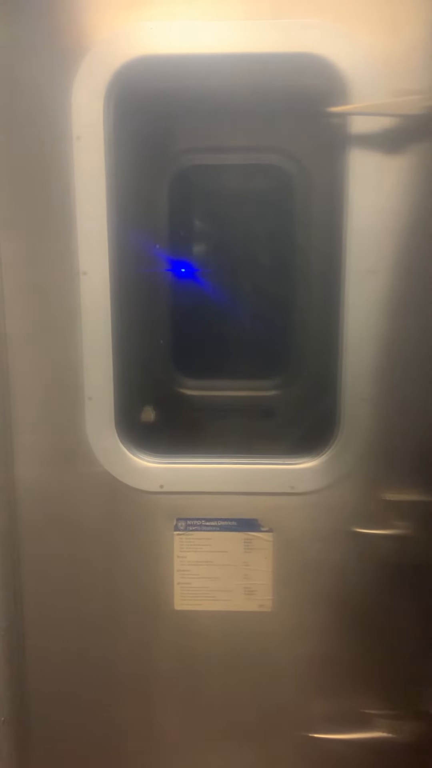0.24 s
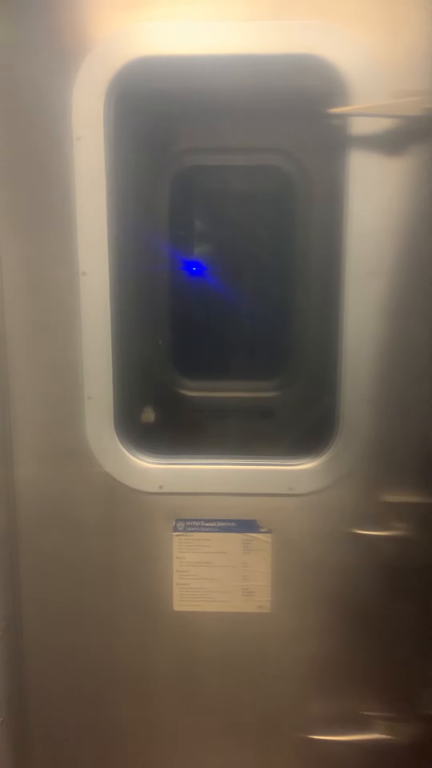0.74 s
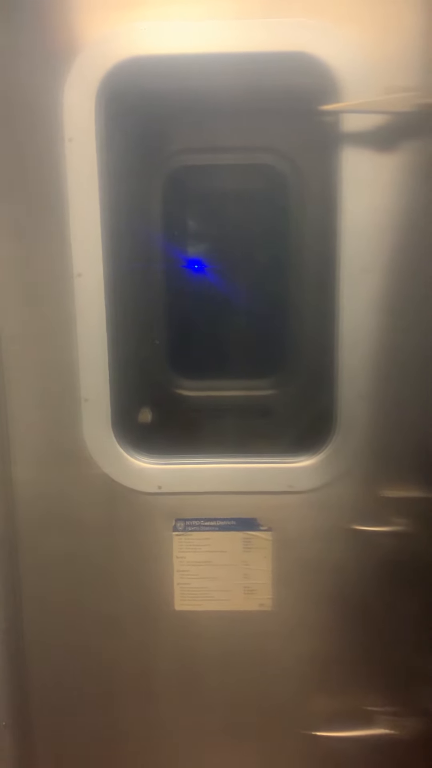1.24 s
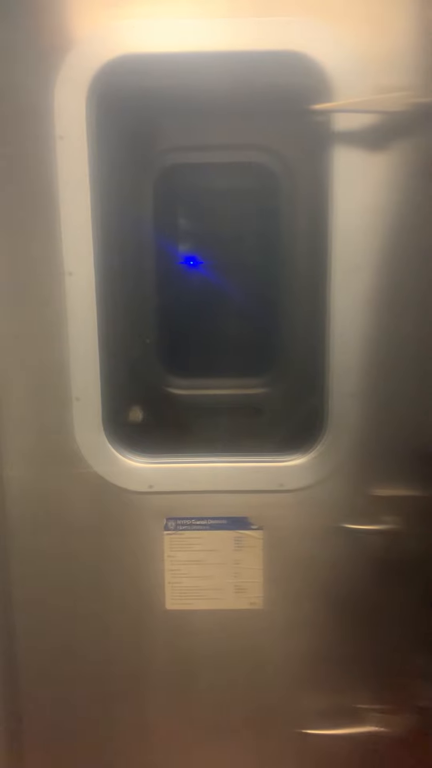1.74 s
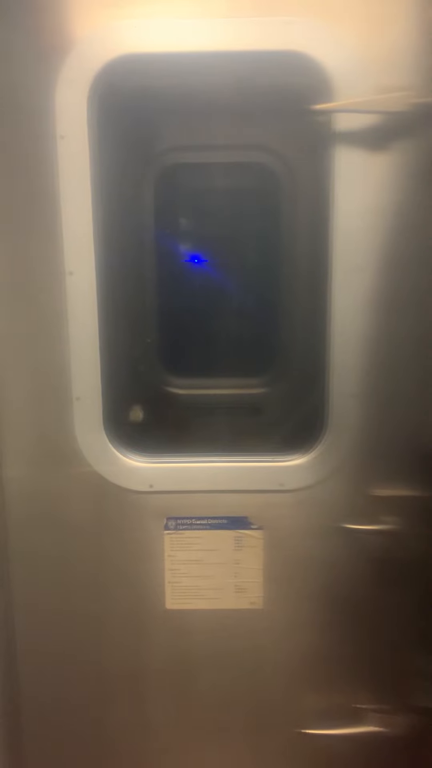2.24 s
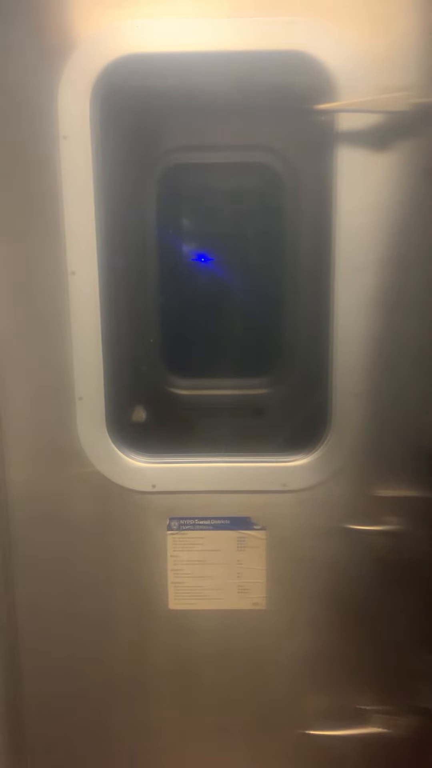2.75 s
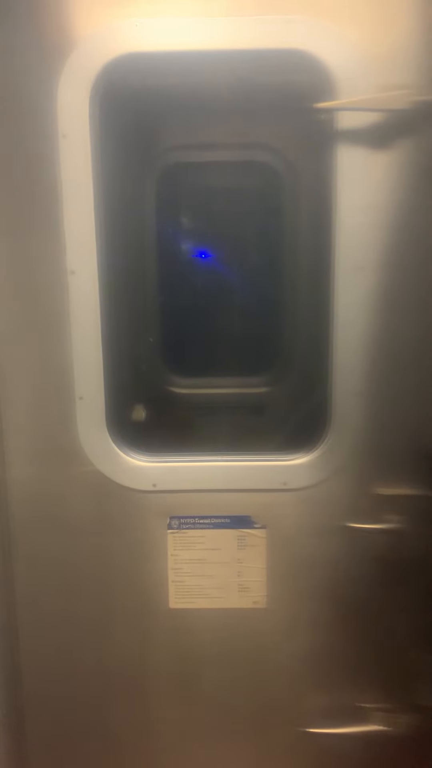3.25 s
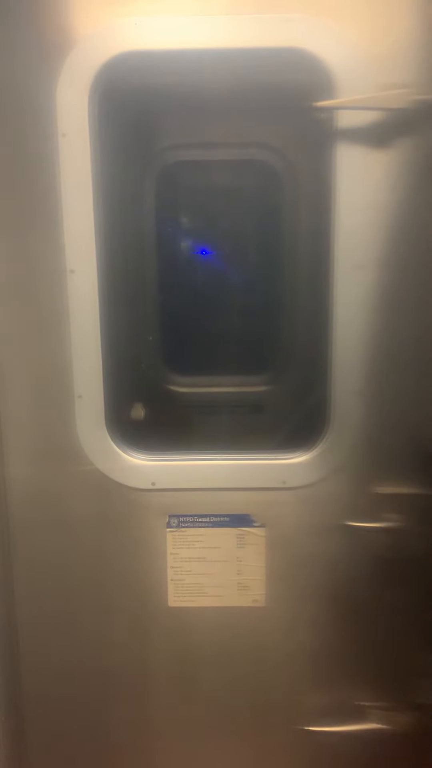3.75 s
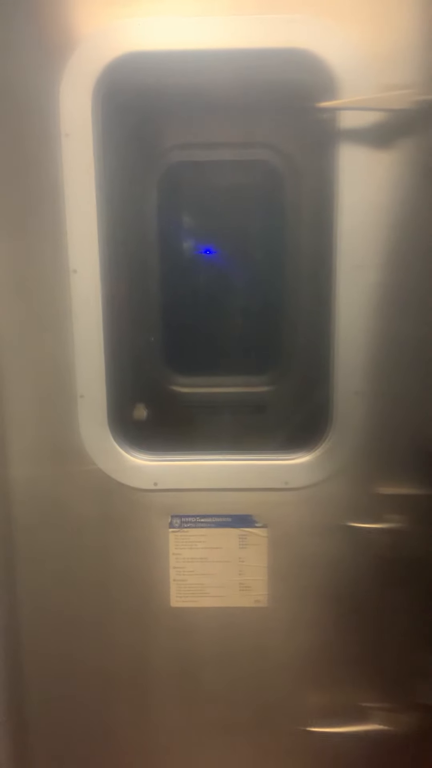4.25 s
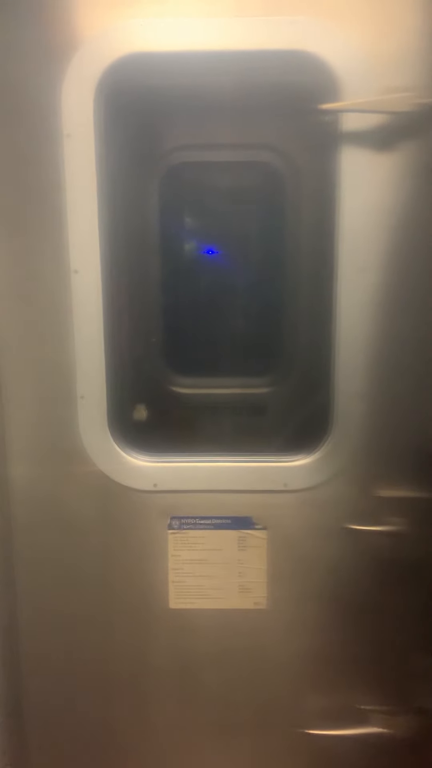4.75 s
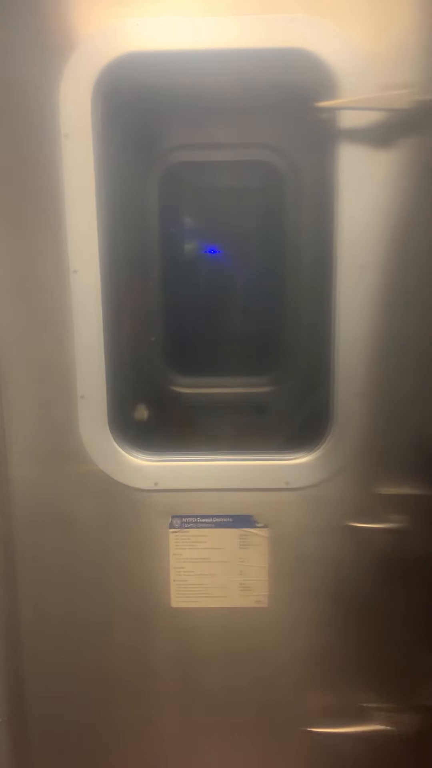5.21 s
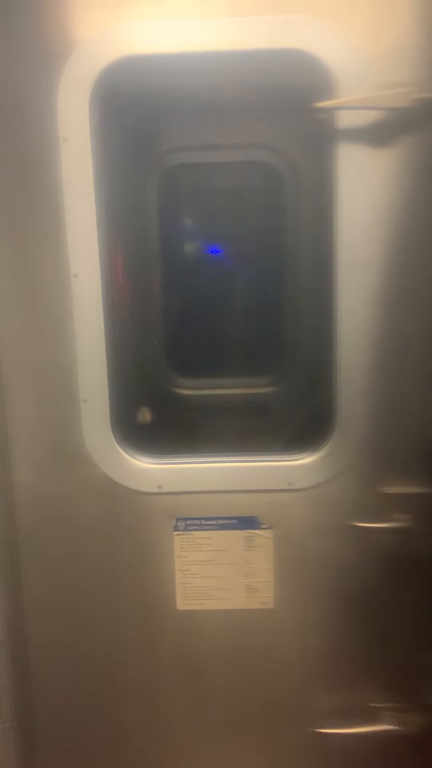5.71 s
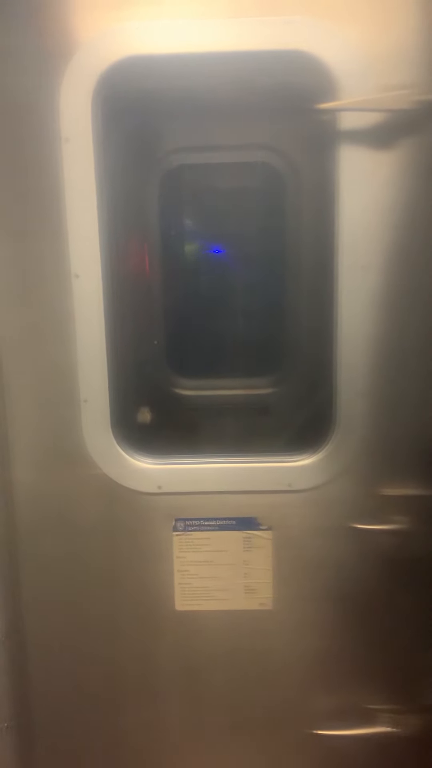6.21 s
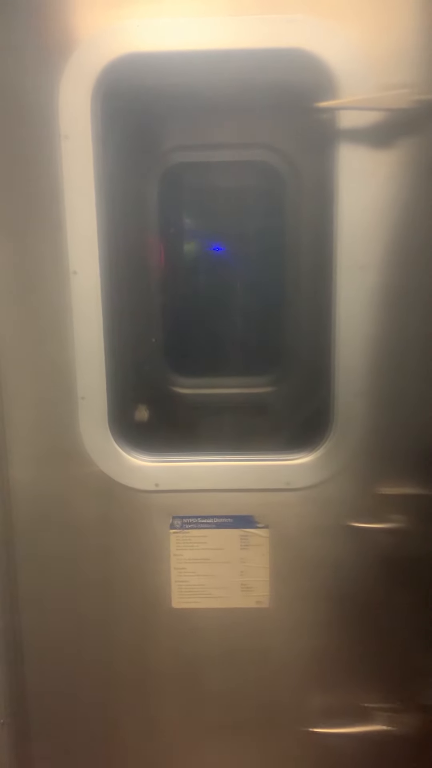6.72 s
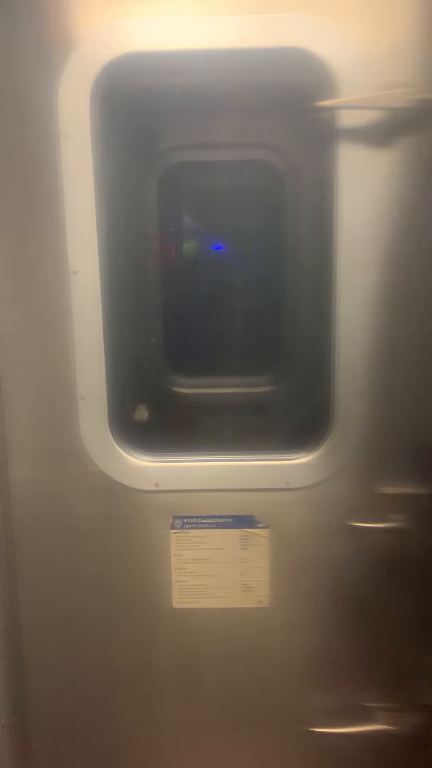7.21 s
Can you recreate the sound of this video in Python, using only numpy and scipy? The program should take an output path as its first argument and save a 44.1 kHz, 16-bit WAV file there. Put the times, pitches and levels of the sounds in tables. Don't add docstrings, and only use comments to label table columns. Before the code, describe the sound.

Inside the rear car of a subway train running through a tunnel, a heavy low wheel-on-rail roar continues throughout, swelling briefly over joints. Panels shudder early on, a sharp dry crack snaps just after one second, and small ticks and metal chinks follow. A bit past four seconds a loose door part clacks and thumps repeatedly, then once more later. Handheld microphone close to the door, nearly mono.

```python
import sys
import numpy as np
from scipy import signal
from scipy.fft import rfft, irfft, next_fast_len
from scipy.io import wavfile

SR = 44100
rng = np.random.default_rng(int(sys.argv[2]) if len(sys.argv) > 2 else 0)


def log_audio(samples):
    frames = np.atleast_2d(samples).T
    limited = np.clip(frames, -1, 1)
    pcm = np.round(limited * 32767).astype(np.int16)
    wavfile.write(sys.argv[1], SR, pcm)


def decibels_to_gain(level_db):
    exponent = np.asarray(level_db, float) / 20
    return 10 ** exponent


N = 329418
SIZE = next_fast_len(N + 4096)
HZ = np.maximum(np.fft.rfftfreq(SIZE, 1 / SR), 1)


def at_hz(points, column=1):
    points = np.array(points)
    return np.interp(np.log(HZ), np.log(points[:, 0]), points[:, column])


def drift(rate_hz):
    r = np.exp(-80 * np.pi * rate_hz / SR)
    slow = signal.lfilter([1], [1, -2 * r, r * r], rng.standard_normal(N // 40 + 2002))
    slow = slow[2000:]
    return np.interp(np.arange(N) / 40, np.arange(len(slow)), slow / slow.std())


def ring(force, hz, t60_s):
    r, w = decibels_to_gain(-60 / (t60_s * SR)), 2 * np.pi * hz / SR
    return signal.lfilter([0, np.sin(w)], [1, -2 * r * np.cos(w), r * r], force + 1e-18)


def soften(x, hz):
    return signal.sosfilt(signal.butter(2, min(hz, 20000), fs=SR, output="sos"), x)


def bandpass(order, low_hz, high_hz):
    return signal.butter(order, [low_hz, high_hz], "band", fs=SR, output="sos")


def pulse(t, rise_s, fall_s):
    t = np.maximum(t, 0)
    return (1 - np.exp(-t / rise_s)) * np.exp(-t / fall_s)


def add(out, s, sound):
    i = round(s * SR)
    out[i:i + len(sound)] += sound[:N - i]


# (frequency [Hz], left-right likeness [0-1], left minus right [dB])
PORTS = [(60, 0.99, 0.9), (200, 0.97, 3.5), (400, 0.85, 1.5), (770, 0.68, -1), (1320, 0.46, -1.5),
         (1950, 0.8, 0.5), (2200, 0, -1), (2350, 0.8, 0.5), (3200, 0.7, -0.5), (3900, 0.9, 0),
         (4450, 0.97, 1.5), (5000, 1, 0), (5500, 0.99, -0.5), (15000, 0.92, 0.5)]


def diffuse_noise():
    shared, own = rfft(rng.standard_normal((2, SIZE)))
    alike = np.clip(at_hz(PORTS), 0, 1)
    return np.sqrt(1 + alike) * shared + np.sqrt(1 - alike) * own * np.array([[1], [-1]])


# (time [s], level [dB])
TRACK = [(0.0, -25), (0.35, -22.5), (0.56, -21), (1.02, -25), (1.27, -21.5), (1.81, -24.5), (2.21, -23.5),
         (3.58, -26.5), (4.2, -23.5), (4.43, -24), (4.6, -23.5), (5.08, -23), (5.18, -25), (6.57, -26.5),
         (6.99, -23.5), (7.47, -25)]
TRACK_SHARE = [1.8, 0.35, .25, 0.37]
# (time [s], swell over the roar [dB], lean to the highs [dB per register], dying time [s])
JOINTS = [(0.319, 6, -1, 0.074), (.45, -6.5, -4.5, 0.048), (.59, 3.5, 0, 0.088), (.705, 0, 0, 0.086),
          (1.05, 3, -5, 0.02), (1.95, 0.5, 0, 0.053), (2.25, -3.5, 0, 0.25), (3.49, 0.5, -5.5, 0.026),
          (3.62, 4, 3.5, 0.039), (3.92, -2, 3, 0.045), (4.87, -11.5, -1.5, .1), (5.07, -10, -5.5, 0.072),
          (5.79, -6.5, -0.5, 0.022), (6.9, -9, 1, 0.029), (7.24, -5, 3.5, 0.087), (7.41, -1, -4.5, .05)]
JOINT_REACH_DB = [-4, 1, 0.1, 0.5]
JOINT_RISE_S = 0.022
SHUDDER_DB, SHUDDER_S = 11, 0.06


def swells(t):
    track_db = np.interp(t, *np.transpose(TRACK))
    power = np.ones((4, len(t)))
    for s, db, lean_db, fall_s in JOINTS:
        reach_db = db + np.array(JOINT_REACH_DB) + lean_db * (np.arange(4) - 2)
        power += decibels_to_gain(reach_db)[:, None] ** 2 * pulse(t - s, JOINT_RISE_S, fall_s)
    for s, db, *_ in THUMPS:
        power[0] += decibels_to_gain(db + SHUDDER_DB) ** 2 * pulse(t - s, JOINT_RISE_S, SHUDDER_S)
    return np.outer(TRACK_SHARE, track_db - np.median(track_db)) + 10 * np.log10(power)


REGISTER_HZ = [70, 300, 2000, 7000]
# (frequency [Hz], density [dB per Hz])
ROAR = [(20, -25), (45, 0), (100, 1.54), (330, 0), (700, -11.5), (1150, -15.5), (1600, -23), (2500, -26),
        (3950, -28.5), (4500, -37.5), (6500, -37), (7800, -58), (11000, -65), (14500, -69.5)]
ROAR_DB = -24
# (frequency [Hz], width [Hz], gain [dB], negative = dip)
PANELS = [(106, 13, 1.5), (158, 14, 0), (250.5, 28, -3), (338, 56, 2), (404, 24, -3.5), (453, 28, 3.5),
          (500, 40, -3), (619, 76, 3.5), (1070, 133, 4.5), (2520, 340, 2.5), (5150, 460, 4.5),
          (6050, 400, -5), (6450, 300, -7), (9100, 550, 4.5)]
# (lag [s], ripple depth [dB])
ECHOES = [(.0043, 0.7), (.0071, 0.85), (0.0118, 0.7), (.0173, 0.65)]


def roar(shared_db, own_db):
    colour_db = at_hz(ROAR)
    colour_db += sum(db / (1 + (2 * (HZ - hz) / width) ** 2) for hz, width, db in PANELS)
    ripple_db = sum(db * np.cos(2 * np.pi * HZ * lag) for lag, db in ECHOES)
    colour_db += np.clip(HZ / 1500 - 0.5, 0, 1) * ripple_db
    spectrum = diffuse_noise() * decibels_to_gain(colour_db) / (1 + (HZ / 14800) ** 30)
    grid_s = np.arange(0, N / SR, 0.004)
    levels_db = swells(grid_s)
    jolts = drift(9)
    place = np.clip(1.5 * np.log2(HZ / 25), 0, 14)
    out = 0
    for k in range(15):
        register = np.interp(np.log(25 * 2 ** (k / 1.5)), np.log(REGISTER_HZ), range(4))
        share = np.clip(1 - abs(register - np.arange(4)), 0, 1)
        swell_db = np.interp(np.arange(N) / SR, grid_s, share @ levels_db)
        band = irfft(spectrum * np.clip(1 - abs(place - k), 0, 1), SIZE)[:, :N]
        out = out + band * decibels_to_gain(swell_db + shared_db * jolts + own_db * drift(11.0))
    return decibels_to_gain(ROAR_DB) * out / irfft(spectrum, SIZE).std()


# (time [s], peak [dB], panel pitch [Hz], overtone share [ratio], widest-swing delay [s])
THUMPS = [(4.2033, -5.5, 83.6, 0.68, 0.0089), (4.255, -13, 85.6, .29, .006), (4.335, -3.5, 86, .15, .013),
          (4.392, -12, 83.6, .19, .006), (4.4155, -16, 83, .2, .012), (4.461, -11.5, 85, 0.19, .007),
          (4.503, -15, 84, .2, .009), (4.5265, -14, 80, .2, .009), (4.56, -5.5, 83, .38, .011),
          (4.6125, -11, 82, 0.25, .004), (5.413, -5.5, 80.7, 0.6, .009), (5.468, -17, 85, .17, .009)]


def thumps():
    out, t = np.zeros(N), np.arange(-800, 2500) / SR
    for s, db, hz, overtone, delay_s in THUMPS:
        swing = np.exp(-((t - delay_s) / 0.015) ** 2)
        turn = 2 * np.pi * hz * t
        add(out, s + t[0], decibels_to_gain(db) * 0.6 * swing * (np.sin(turn) + overtone * np.sin(2 * turn)))
    return out


# (time [s], peak [dB], rebound [dB], bright crack [dB])
CLACKS = [(0.3277, -29, 0, -53), (1.961, -25, -6, -56), (2.2286, -26, -5, -64), (3.635, -26, -1, -58.5),
          (3.9338, -28, -9, -64), (4.1786, -16, -1, -36), (4.21, -37, -9, -35), (4.3127, -19, -1, -36),
          (4.343, -28, -8, -48), (4.543, -26, -10, -58), (5.3867, -15.5, -6, -38)]
# (frequency [Hz], level [dB], t60 [s])
CLACK_MODES = [(950, -14, 0.033), (1292, -4, 0.06), (1456, -6.5, 0.043), (1705, -6, 0.046),
               (2080, -10.5, 0.016), (2600, -9, 0.022), (3140, -5, 0.016), (3510, -8.5, 0.016)]


def clacks():
    out, t = np.zeros(N), np.arange(4500) / SR
    rebound_s = 0.011
    bright = bandpass(3, 4800, 8000)
    for s, db, rebound_db, crack_db in CLACKS:
        rattle = rng.random(len(t)) < 0.05
        force = 0.11 * rng.standard_normal(len(t)) * np.exp(-t / 0.013) * rattle
        force[[0, round(rebound_s * SR)]] = 1, decibels_to_gain(rebound_db)
        force = soften(force, hz=5000)
        body = 0
        for k, (hz, mode_db, t60_s) in enumerate(CLACK_MODES):
            uneven_db = mode_db - 8.5 + rng.normal(0, 1.8)
            body = body + (-1) ** k * decibels_to_gain(uneven_db) * ring(force, hz, t60_s)
        burst = np.exp(-t / 0.0022) + 0.15 * np.exp(-t / 0.015) + 0.4 * pulse(t - rebound_s, 0.0003, 0.002)
        crack = signal.sosfilt(bright, rng.standard_normal(len(t)) * burst)
        add(out, s, decibels_to_gain(db) * body + decibels_to_gain(crack_db) * crack)
    return out


# (time [s], peak [dB], pitch [Hz])
SWINGS = [(0.359, -23.5, 139.4), (0.374, -22, 281), (0.399, -21.7, 105.5), (0.409, -25, 409),
          (0.414, -33.0, 651), (0.419, -22.5, 137), (0.459, -24, 366), (0.464, -27, 82.5),
          (0.469, -21, 293), (0.489, -27, 177.5), (0.539, -27.4, 345), (0.614, -24.2, 159.4),
          (0.614, -24.0, 62), (0.624, -27, 422), (0.624, -27, 197), (0.639, -28.3, 363),
          (0.639, -23.8, 288), (0.668, -23.2, 132), (0.708, -18.5, 89.5), (0.718, -24.0, 137),
          (0.738, -29.5, 445.5), (0.768, -28, 250), (0.773, -28.3, 374), (0.788, -21, 81),
          (0.813, -24, 304), (1.023, -27.2, 230), (1.063, -26, 283), (1.068, -28.8, 438),
          (1.078, -27.2, 325), (1.187, -28, 115.6), (1.212, -24.5, 444), (1.267, -24, 288),
          (1.442, -27.5, 447), (1.566, -23.5, 156), (1.746, -26, 185), (1.781, -28.5, 439), (2.0, -23, 362),
          (2.05, -26.8, 283), (2.05, -24.5, 86), (2.105, -25, 319), (2.275, -26.9, 325), (2.764, -26, 81),
          (3.672, -27.5, 420), (4.071, -24, 109), (4.894, -26, 62), (5.792, -24.5, 339),
          (7.174, -28.4, 362), (7.259, -30, 534)]
SWING_S = 0.035


def swings():
    out, t = np.zeros(N), np.arange(-3500, 3500) / SR
    push = np.exp(-(t / SWING_S) ** 2)
    for s, db, hz in SWINGS:
        turns = hz * t * (1 - 0.23 * t) + rng.random()
        add(out, max(s + t[0], 0), decibels_to_gain(db) * push * np.sin(2 * np.pi * turns))
    return out


# (time [s], peak [dB], pitch [Hz])
KNOCKS = [(.089, -24, 600), (.338, -22, 611), (.549, -26, 616), (1.247, -25, 581), (1.516, -25, 573),
          (2.231, -25, 563), (2.776, -22, 638), (4.635, -27, 627), (4.889, -25, 563), (5.697, -27.5, 1130),
          (6.154, -26.5, 622), (7.091, -25.5, 600)]


def knocks():
    out, click = np.zeros(N), np.zeros(7000)
    click[0] = 1
    for s, db, hz in KNOCKS:
        add(out, s, decibels_to_gain(db) * ring(soften(click, hz=2500), hz, t60_s=0.022))
    return out


# time [s], peak [dB]
CRACK = (1.2881, -12)
# (frequency [Hz], level [dB], t60 [s])
CRACK_MODES = [(1000, -12, .004), (1700, -11.5, 0.006), (2300, -10, .004), (3900, -4, 0.0028),
               (5420, -12, 0.0053), (6720, -10, 0.0013), (8750, -1, 0.0009), (13000, -7, 0.00043)]


def crack():
    out, click = np.zeros(N), np.zeros(600)
    click[0] = 1.26
    blow = soften(click, hz=14000)
    body = sum(decibels_to_gain(db) * ring(blow, hz, t60_s) for hz, db, t60_s in CRACK_MODES)
    add(out, CRACK[0], decibels_to_gain(CRACK[1]) * body)
    return out


# (time [s], peak [dB])
TICKS = [(0.4194, -43.5), (1.506, -58), (1.592, -66), (1.954, -53), (2.14, -47.5), (2.2248, -64.5),
         (2.5994, -70.5), (3.076, -61.5), (3.273, -65), (3.2917, -46), (3.302, -65), (3.511, -47),
         (3.7786, -52.5), (3.7944, -73), (3.8307, -48.5), (3.8541, -52.5), (.3207, -59.5), (.381, -61.5),
         (.5831, -66.5), (2.2747, -62), (3.771, -62), (4.1796, -55), (4.2093, -57), (4.307, -61.5),
         (4.3131, -53.5), (4.4248, -64), (5.3872, -64)]
TICK_APART = 0.35


def ticks():
    out, t = np.zeros((2, N)), np.arange(600) / SR
    band = bandpass(3, 4000, 14500)
    for s, db in TICKS + [(CRACK[0], CRACK[1] - 27)]:
        decay = np.exp(-t / 0.0003) + 0.019 * np.exp(-t / 0.0035)
        shared, own = rng.standard_normal((2, len(t))) * decay
        shared[0] += 3.0
        apart = TICK_APART * 2 * own
        snap = signal.sosfilt(band, [shared + apart, shared - apart])
        for port in range(2):
            add(out[port], s, decibels_to_gain(db + 10.5) * snap[port] / abs(snap).max())
    return out


# (time [s], peak [dB], pitch [Hz], t60 [s])
CHINKS = [(0.2329, -57, 10500, 0.05), (0.942, -59, 12000, 0.046), (1.0377, -60, 11500, 0.056),
          (1.063, -50.5, 11760, 0.05), (1.1395, -47, 11950, 0.057), (1.1448, -48, 11900, .04),
          (1.7569, -62, 11000, 0.056), (1.948, -49, 11570, 0.08), (2.027, -50, 11070, 0.054),
          (2.4638, -49.5, 11000, 0.05), (2.475, -51, 11100, 0.056), (2.566, -49.5, 10740, 0.046),
          (2.678, -45.5, 11150, 0.05), (4.1495, -54.5, 11400, 0.035), (4.265, -60, 11700, 0.05),
          (5.452, -65, 11400, 0.044), (6.4507, -65.5, 11200, 0.046)]


def chinks():
    out, t = np.zeros(N), np.arange(5000) / SR
    for s, db, hz, t60_s in CHINKS:
        force = rng.standard_normal(len(t)) * t * np.exp(-t / 0.0021)
        force = ring(force, hz * 1.01, 0.0054)
        spread = 0.016 * (np.arange(-2, 3) + rng.normal(0, 0.3, 5))
        sound = sum(ring(force, hz * (1 + d), max(t60_s, 0.01)) for d in spread)
        echo = rng.standard_normal(len(t)) * np.exp(-t / 0.02) * abs(force).max()
        sound += 0.12 * ring(echo, hz, 0.004)
        add(out, s - 0.001, decibels_to_gain(db + 2.5) * sound / abs(sound).max())
    return out


def rub(out, s, length_s, hz, width_hz, db):
    t = np.arange(-length_s, length_s, 1 / SR)
    swell = np.exp(-(2 * t / length_s) ** 2)
    grains = rng.standard_normal(len(t)) * decibels_to_gain(2.5 * rng.exponential(1, len(t)))
    band = signal.sosfilt(bandpass(2, hz - width_hz / 2, hz + width_hz / 2), grains)
    rms = np.sqrt(np.average(band ** 2, weights=swell ** 2))
    add(out, s + t[0], decibels_to_gain(db) * swell * band / rms)


# (time [s], length [s], pitch [Hz], width [Hz], level [dB rms])
GRAINY_SWELLS = [(.335, .03, 2860, 300, -41), (.345, .06, 2200, 1500, -40), (.41, .09, 2200, 1500, -41),
                 (4.22, .05, 2600, 500, -45), (5.48, .01, 6500, 600, -52), (5.467, .01, 2500, 500, -40),
                 (.66, .06, 2300, 2000, -46), (3.943, .035, 1000, 340, -28), (3.95, .065, 2700, 830, -44),
                 (3.74, .06, 900, 45, -37), (3.3, .03, 300, 110, -28), (4.01, .03, 280, 120, -27),
                 (3.27, 0.075, 88, 53, -26.5), (5.2, 0.095, 105, 54, -26.5), (3.75, .05, 70, 50, -27),
                 (2.75, .06, 760, 640, -34.5), (.1, .09, 100, 51, -31), (1.88, .087, 70, 40, -30),
                 (7.43, .028, 300, 160, -26.5), (5.7, .15, 115, 23, -29), (7.06, .08, 330, 50, -28.5),
                 (.74, .1, 2400, 2000, -44), (2.59, .04, 3000, 3000, -46.5), (3.26, .08, 315, 50, -27.5),
                 (4.55, .04, 1250, 240, -35.5), (1.92, .092, 5130, 490, -47), (5.1, .068, 1200, 250, -40),
                 (6.2, .15, 280, 60, -29.5), (6.22, .05, 1300, 60, -40), (2.46, .08, 310, 50, -29.5),
                 (2.82, .08, 330, 40, -28), (2.5, .06, 160, 40, -28), (5.92, .05, 310, 40, -29.5),
                 (1.99, .07, 349, 70, -21), (4.33, .03, 180, 50, -22), (1.55, .15, 570, 91, -34),
                 (4.45, .2, 165, 30, -28.5)]


def grainy_swells():
    out = np.zeros(N)
    for s, length_s, hz, width_hz, db in GRAINY_SWELLS:
        rub(out, s, length_s, hz, width_hz, db)
    return out


# (time [s], length [s], pitch [Hz], level [dB rms])
RUSTLES = [(0.39, 0.15, 8000, -58), (0.36, 0.15, 11500, -71), (.68, .12, 11800, -72),
           (.68, 0.18, 9000, -67.5), (1.1, .25, 10000, -71), (1.3, .25, 10000, -68), (1.6, .2, 9300, -77.5),
           (1.99, 0.095, 8500, -66.5), (2.33, 0.2, 9700, -65), (2.1, .12, 6600, -64.5),
           (2.6, .05, 6900, -66), (3.07, .06, 13500, -75.5), (3.66, 0.11, 7800, -78),
           (4.477, 0.2, 13500, -81.5), (4.448, 0.35, 9900, -74.5), (4.997, .3, 9500, -76),
           (5.1, .15, 11500, -78.5), (5.63, 0.22, 11500, -78), (.87, 0.083, 6500, -63),
           (7.361, .06, 10000, -64), (4.365, .03, 13500, -73), (1.31, .04, 14800, -77),
           (1.42, .12, 14200, -78), (1.6, .05, 14700, -75.5), (1.2, .08, 14200, -78),
           (4.46, .12, 14000, -78)]


def rustles():
    out = np.zeros(N)
    for s, length_s, hz, db in RUSTLES:
        rub(out, s, length_s, hz, min(0.26 * hz, 2600), db)
    return out


WHINE_HZ = [291, 442, 1060, 1120, 2557, 2460, 5997, 6378, 6560]
# (width [Hz], level at start [dB rms], level at end [dB rms])
WHINE = [(8.06, -39.5, -47.5), (12, -37, -51.5), (5, -46, -47), (40, -52.5, -46), (22, -64.5, -58),
         (120, -64, -50.5), (5, -75.5, -77), (40, -76, -66.5), (60, -77, -67)]


def whine():
    noise, out, t = rng.standard_normal((2, N)), 0, np.arange(N) / SR
    force = noise[0] + 0.85 * noise
    for hz, (width_hz, start_db, end_db) in zip(WHINE_HZ, WHINE):
        t60_s = 2.0 / width_hz
        line = ring(ring(force, hz, t60_s), hz, t60_s)
        out = out + decibels_to_gain(start_db + (end_db - start_db) * t / t[-1]) * line / line.std()
    return out


def scene():
    steady = roar(shared_db=0.55, own_db=1.03) + whine()
    door = clacks() * decibels_to_gain(np.array([[-1.5], [1.5]]))
    snaps = (ticks() + crack()) * decibels_to_gain(np.array([[0.2], [-0.2]]))
    panels = thumps() + swings() + knocks() + grainy_swells()
    return steady + door + snaps + panels + chinks() + rustles()


# (frequency [Hz], phase [rad])
LEAD = [(0, 0), (350, -.5), (1100, -.45), (1400, .2), (1900, .4), (2300, 1.1), (3300, 1.5), (4000, 2),
        (4400, 2.8), (5000, 3.55), (8950, 9.42), (13200, 15.7), (15500, 19.1), (22050, 19)]
CUTOFF_HZ, RUN_IN = 15750, 2048


def port_pair(dry):
    lead = np.interp(HZ, *np.transpose(LEAD))
    left = decibels_to_gain(at_hz(PORTS, column=2) / 2) * np.exp(0.5j * lead)
    ports = left ** np.array([[1], [-1]])
    padded = np.pad(dry, [(0, 0), (RUN_IN, RUN_IN)], "reflect")
    heard = irfft(rfft(padded, SIZE) * ports * (HZ < CUTOFF_HZ), SIZE)
    return heard[:, RUN_IN:RUN_IN + N]


def top_cut(x):
    return signal.sosfilt(signal.butter(12, 16750, fs=SR, output="sos"), x)


def record(dry):
    heard = port_pair(dry)
    return top_cut(heard)


dry = scene()
out = record(dry)
log_audio(out)
```